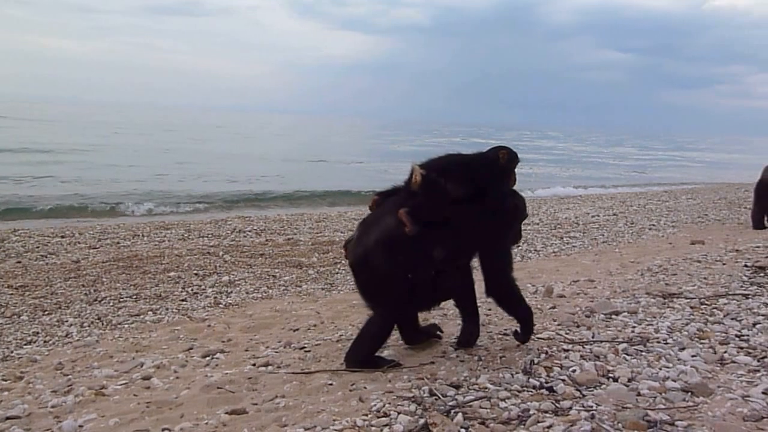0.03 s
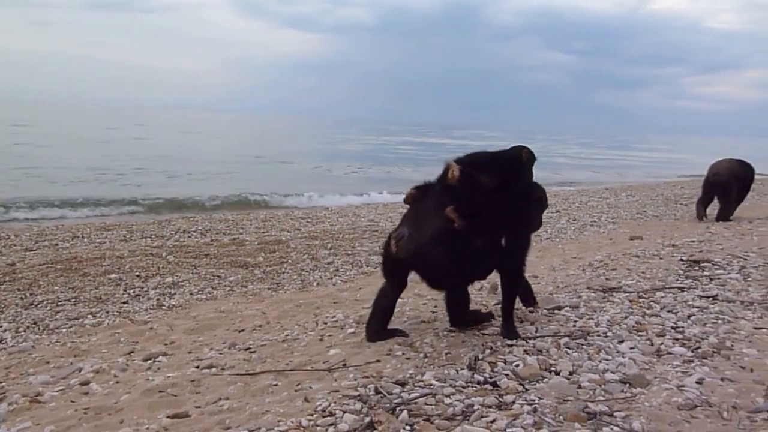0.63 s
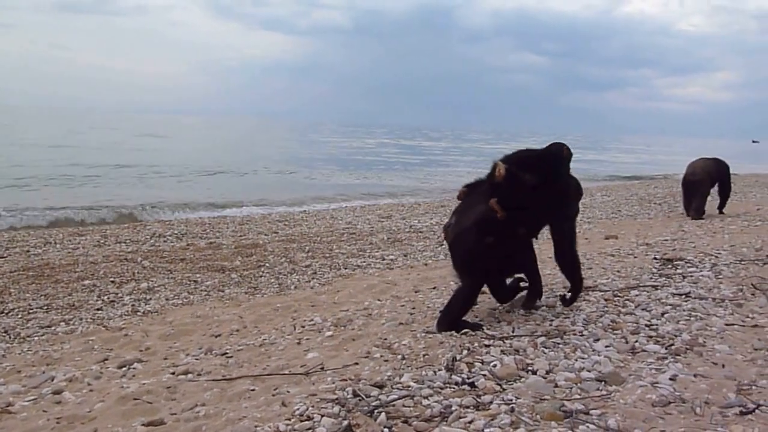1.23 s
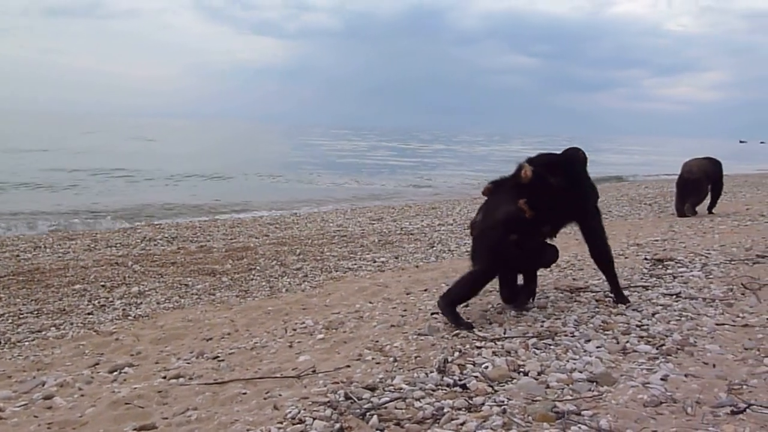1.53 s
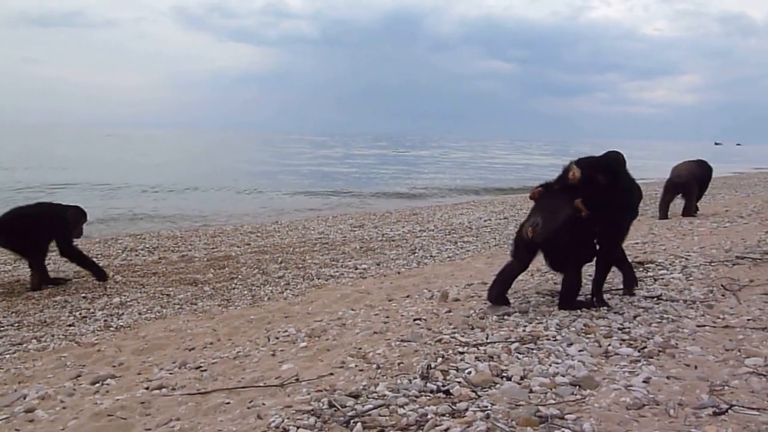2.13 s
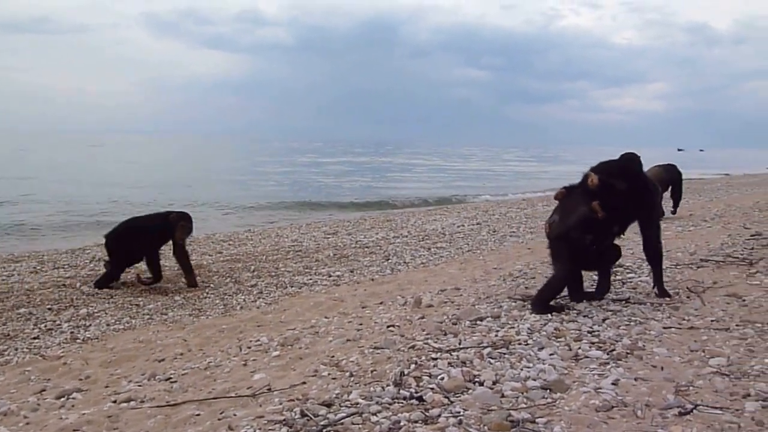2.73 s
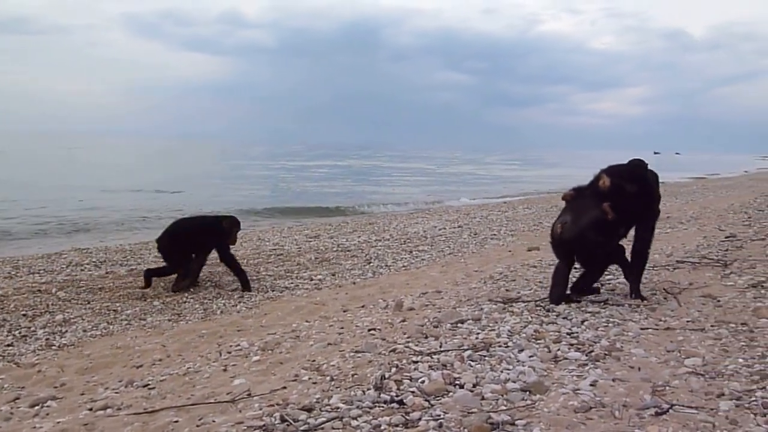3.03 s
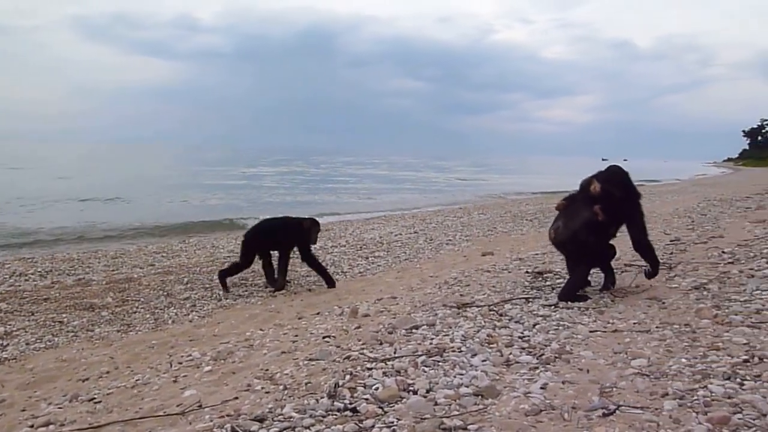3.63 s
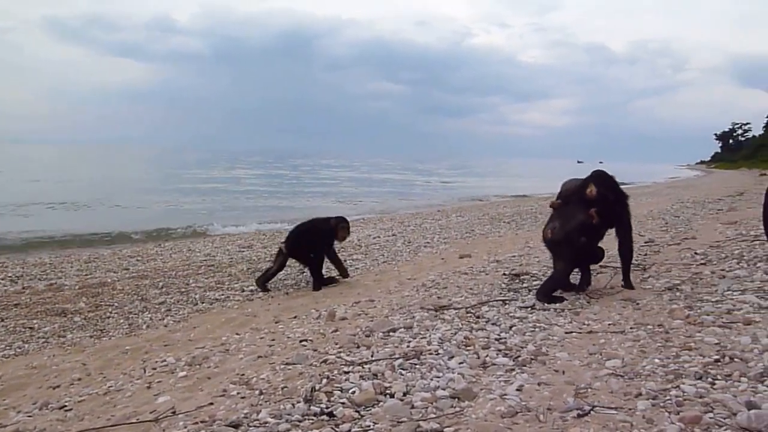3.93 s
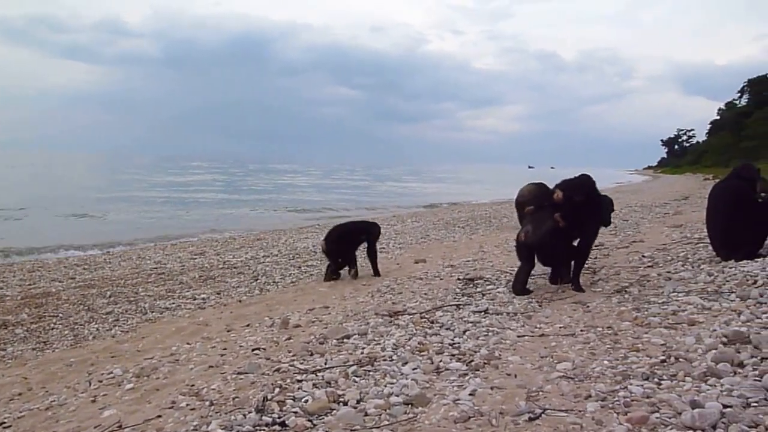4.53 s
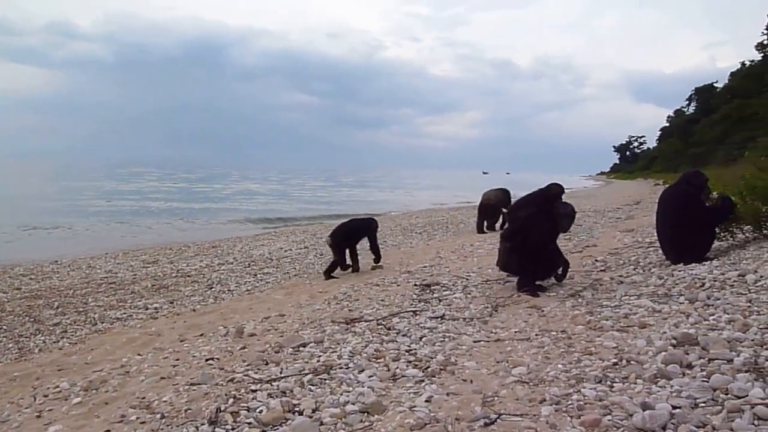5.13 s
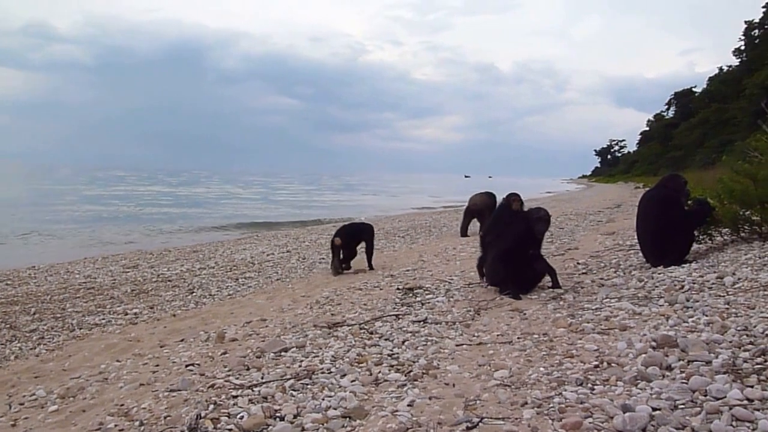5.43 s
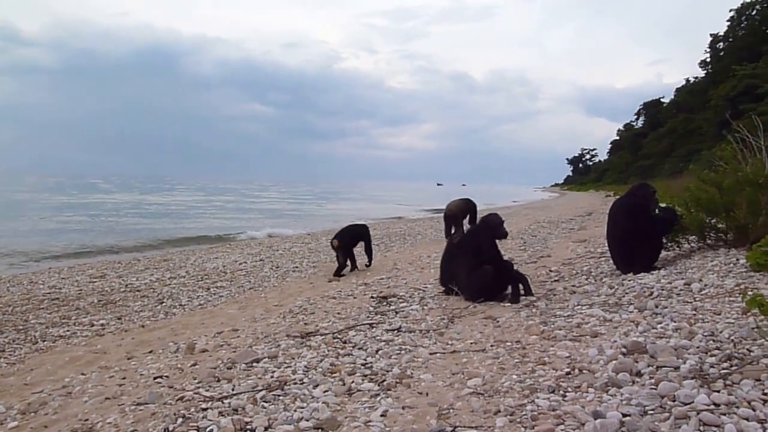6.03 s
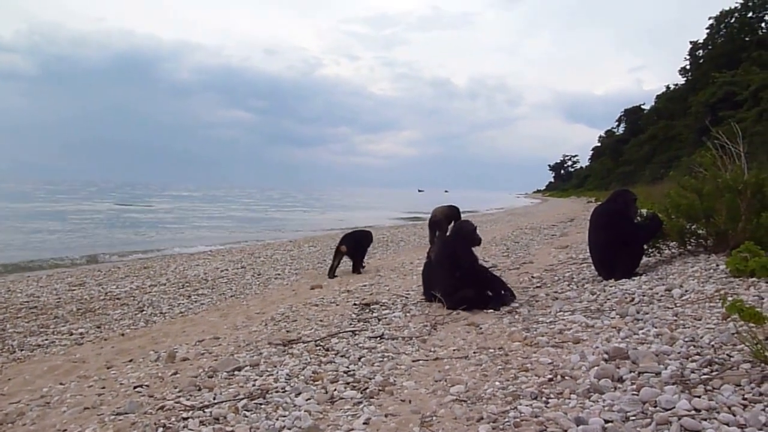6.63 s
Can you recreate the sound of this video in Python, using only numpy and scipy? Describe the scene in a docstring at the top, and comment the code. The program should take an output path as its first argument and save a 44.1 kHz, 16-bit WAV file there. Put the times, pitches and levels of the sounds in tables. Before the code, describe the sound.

Gentle lake waves splash and drain through shingle, with faint crunching animal footsteps and a soft breeze on the microphone.

```python
"""Small lake waves wash up a pebble beach, over a faint hum and a light breeze on a camera's microphone.
From the start foam fizzes, bubbles pop, water slaps over air pockets, and passing chimpanzees
crunch faintly on the shingle. Near 1 s a wave breaks close on the left, throws spray and drains away.
Softer washes follow, with more steps around 3 s. Just after 4 s a second wave breaks on the left;
then loose stones knock, small bubbles plop and a few last steps sound under two gentle washes."""
import sys
import numpy as np
from scipy import signal
from scipy.io import wavfile
from scipy.ndimage import uniform_filter1d

SR = 44100
rng = np.random.default_rng(int(sys.argv[2]) if len(sys.argv) > 2 else 0)


def to_wav(sig):
    """Store sig (one row per channel, or 1-D mono) as 16-bit WAV at the path in sys.argv[1].

    Samples outside -1..1 are clipped; the rate is SR.
    """
    pcm = np.clip(np.atleast_2d(sig), -1, 1) * 32767
    pcm = np.round(pcm).astype(np.int16)
    wavfile.write(sys.argv[1], SR, pcm.T)  # frames by channels


N = 303408
TIME = np.arange(N) / SR
FRAME, HOP = 1024, 256
FRAME_S = np.arange(N // HOP + 5) * HOP / SR
BIN_HZ = np.fft.rfftfreq(FRAME, 1 / SR)


def gain_of(db):
    """Decibels to amplitude."""
    return 10 ** (np.asarray(db) / 20)


def pan(left_db):
    """Stereo gains that put the left channel left_db above the right."""
    return gain_of(left_db * np.array([[1], [-1]]) / 2)


def unit_rms(x):
    """Normalises to an rms of one."""
    return x / np.sqrt(np.mean(x ** 2) + 1e-20)


def curve(points, hz=BIN_HZ):
    """Draws a curve through breakpoints on a log-frequency axis."""
    point_hz, value = np.transpose(points)
    return np.interp(np.log(hz + 1), np.log(point_hz + 1), value)


def automation(points, column=1):
    """Reads one automation lane at every frame."""
    lanes = np.transpose(points)
    return np.interp(FRAME_S, lanes[0], lanes[column])[:, None]


def patches(frames, bins):
    """Smooth random modulation over time and frequency."""
    noise = rng.standard_normal((len(FRAME_S), len(BIN_HZ)))
    return unit_rms(uniform_filter1d(uniform_filter1d(noise, frames, axis=0), bins, axis=1))


def stereo_noise(colour_db, unshared_db, lead_rad=0, left_db=0):
    """Noise through a moving EQ, as two closely spaced microphone ports hear it."""
    a, b, c, d = rng.standard_normal((4, len(FRAME_S), len(BIN_HZ)))
    left, independent = a + 1j * b, c + 1j * d
    unshared = np.minimum(gain_of(unshared_db), 1)
    right = (np.sqrt(1 - unshared ** 2) * left + unshared * independent) * np.exp(-1j * lead_rad)
    spectra = np.array([left * gain_of(left_db / 2), right * gain_of(-left_db / 2)]) * gain_of(colour_db)
    _, noise = signal.istft(spectra.swapaxes(1, 2), nperseg=FRAME, noverlap=FRAME - HOP)
    return unit_rms(noise[:, :N])


def grains(per_s, band_hz, cycles, width, spread_db=0, chirp=0, pitches=32):
    """A cloud of tiny pings that decay by 1/e in `cycles` periods, each pitch with its own pan."""
    out = np.zeros((2, N))
    for hz in np.geomspace(*band_hz, pitches):
        age = np.arange(int(10 * cycles * SR / hz)) * hz / SR / cycles  # in decay times
        ping = np.sin(2 * np.pi * cycles * age * (1 + chirp * age)) * np.exp(-age) * np.sqrt(hz)
        ping *= 1 - np.exp(-2 * cycles * age)  # attack within the first cycle
        triggers = rng.random(N) < per_s / pitches / SR
        accents = gain_of(spread_db * np.minimum(rng.exponential(1, N), 4))
        side = width * (2 * rng.random() - 1)
        out += np.array([[1 + side], [1 - side]]) * signal.oaconvolve(triggers * accents, ping)[:N]
    return unit_rms(out)


def resonate(x, hz, width_hz):
    """A sweepable band-pass centred on hz, with a double pole for steep skirts."""
    carrier = np.exp(2j * np.pi * np.cumsum(hz * np.ones(len(x))) / SR)
    pole = np.exp(-np.pi * width_hz / SR)
    baseband = signal.lfilter([(1 - pole) ** 2], [1, -2 * pole, pole * pole], x / carrier)
    return unit_rms((carrier * baseband).real)


def hum(db=-67, hz=138, waver_hz=1.0):
    """A faint low tone with a wavering pitch."""
    drift = unit_rms(uniform_filter1d(rng.standard_normal(N), size=3000))
    return gain_of(db) * unit_rms(np.sin(2 * np.pi * np.cumsum(hz + waver_hz * drift) / SR))


# EQ of the breeze: f/Hz, level/dB
BREEZE_EQ = [(25, -53), (55, -51), (80, -56), (105, -28), (135, -31.5), (175, -6), (220, -7), (280, 3),
             (345, -1.5), (430, -3), (700, -23.5), (2000, -59.5)]
def breeze(db=-46.5):
    """Air buffets the microphone: a lumpy, nearly mono rumble with hardly any sub-bass."""
    colour_db = curve(BREEZE_EQ) + 2.1 * patches(frames=14, bins=6)
    return stereo_noise(colour_db, unshared_db=-18.5) * gain_of(db)


# footfall cues: t/s, level/dB, decay/s, fine gravel share/0-1
FOOTFALLS = [(0.035, -34.5, 0.053, 0.05), (0.36, -42, 0.066, 0.8), (0.49, -39, .04, .85),
             (0.595, -26, 0.02, 0.06), (0.83, -45, 0.035, .6), (0.893, -36, .012, 0.2),
             (2.083, -32.5, 0.054, 0.05), (2.96, -32, 0.02, .4), (3.028, -38, 0.034, .75),
             (3.118, -33.5, 0.045, 0.1), (3.25, -36, .03, 0), (3.342, -31, 0.015, .92),
             (3.722, -42, 0.032, 0.5), (4.04, -42, .025, .5), (4.14, -48, 0.033, 0.3),
             (5.845, -42, 0.051, 0.4), (5.891, -44, .012, .6), (6.033, -29, .012, 0), (6.325, -39, .02, .6),
             (6.737, -41, 0.019, 0.7)]
def footsteps(db=1.0, attack_s=0.022):
    """Chimpanzee feet press the shingle: short crunches of stones and gravel, slightly right."""
    start, level_db, decay_s, fine = np.transpose(FOOTFALLS)[:, :, None]
    age = np.maximum(TIME - start, 0)
    press = gain_of(level_db) * (1 - np.exp(-age / attack_s)) * np.exp(-age / decay_s)
    stones = grains(per_s=2200, band_hz=(2200, 5000), cycles=6, width=0.3, spread_db=3)
    gravel = grains(per_s=1500, band_hz=(4700, 7200), cycles=11, width=0.3, spread_db=3)
    crunch = stones * (press * np.sqrt(1 - fine)).sum(0) + gravel * (press * np.sqrt(fine)).sum(0)
    return crunch * gain_of(db) * pan(left_db=-1)


# stone hits: t/s, level/dB, f/Hz
STONE_HITS = [(4.273, -27, 2250), (5.273, -33, 2250), (5.389, -34, 2250), (5.656, -30, 2150),
              (6.439, -32, 2400)]
def knocks(decay_s=0.0055, width_hz=1400):
    """A loose stone tips onto its neighbour with a short, dry tick."""
    out = np.zeros(N)
    for start, level_db, hz in STONE_HITS:
        age = np.maximum(TIME - start, 0) / decay_s
        stone = resonate(resonate(rng.standard_normal(N), hz, width_hz), hz, width_hz)
        out += gain_of(level_db) * (1 - np.exp(-2 * age)) * np.exp(-age) * stone
    return out


# wave cues: t/s, level/dB, attack/s, hold/s, foam send/dB, rumble send/dB, share breaking left/0-1
WAVE_CUES = [(-0.1, -36, 0.064, 0.58, -6.5, -9.5, 0.1), (0.469, -35, 0.24, 0.25, -7.5, -14, 0.27),
             (0.845, -33, 0.38, 0.73, -7.5, -7.5, 0.88), (2.083, -43, 0.22, 0.31, -4.5, -3, 0.76),
             (2.421, -40.5, 0.63, 0.36, -3, -9, 0.2), (3.452, -40.5, 0.27, 0.42, -9.5, -18, 0),
             (4.075, -42.5, 0.087, 0.16, -4, -10, 0.5), (4.25, -35.5, 0.21, 0.41, -10.5, -7, 0.8),
             (5.547, -39.5, 0.51, 0.25, -8.5, -13, .35), (6.246, -40.5, .25, 0.46, -8, -5.5, 0.3)]
def wave_powers(t, drain_s=0.53):
    """Each wave swells, holds while it spills, then drains away: one power envelope per wave."""
    start, level_db, attack_s, hold_s = np.transpose(WAVE_CUES)[:4, :, None]
    age = t - start
    swell = np.clip(age / attack_s, 0, 1)
    drain = np.exp(-np.maximum(age - attack_s - hold_s, 0) / drain_s)
    return (gain_of(level_db) * swell * drain) ** 2


def water_controls(t, lap_db=-43.5, lap_foam_db=-6, lap_left=0.19, foam_fade_db_per_s=2.5):
    """Waves over a bed of steady lapping: level/dB, foam send/dB, share breaking left/0-1."""
    start, _, _, _, foam_db, _, left = np.transpose(WAVE_CUES)[:, :, None]
    powers, lapping = wave_powers(t), gain_of(lap_db) ** 2
    total = powers.sum(0) + lapping
    freshness = gain_of(foam_db - foam_fade_db_per_s * (t - start)) ** 2  # dulls as the foam bursts
    foam = (powers * freshness).sum(0) + lapping * gain_of(lap_foam_db) ** 2
    breaking = (powers * left).sum(0) + lapping * lap_left
    return 10 * np.log10(total), 10 * np.log10(foam / total), breaking / total


def rolling_pebbles(db=-14.0):
    """Pebbles grind softly together under the foam: a wide, bright ticking."""
    level_db, foam_db, _ = water_controls(TIME)
    ticks = grains(per_s=1100, band_hz=(2610, 6600), cycles=9, width=0.95, spread_db=5.5)
    return ticks * gain_of(level_db + foam_db + db)


def bubbles(db=-11, lean_db=3):
    """Small bubbles ring with a rising pitch, riding the water's level and leaning toward the breaker."""
    level_db, _, breaking = water_controls(TIME)
    pops = grains(per_s=380, band_hz=(584.6, 2827), cycles=5.8, width=0.15, spread_db=2.5, chirp=0.0036)
    return pops * gain_of(level_db + db) * pan(lean_db * breaking)


# EQ of churned water: f/Hz, level/dB
CHURN_EQ = [(60, -58), (105, -36), (140, -39), (175, -16), (230, -10.5), (283, 7.5), (345, 2.5), (430, -7),
            (560, -11.5), (760, -3), (1000, -24.5), (2000, -62)]
def churn(db=-0.6):
    """Churned water puts a low body under each wave."""
    colour_db = curve(CHURN_EQ) + 0.77 * patches(frames=10, bins=4)
    rumble = stereo_noise(colour_db, unshared_db=-31.5, left_db=-1.0)
    send_db = np.array(WAVE_CUES)[:, 5, None]
    powers = wave_powers(TIME) * gain_of(send_db + db) ** 2
    return rumble * np.sqrt(powers.sum(0))


# large bubbles: t/s, level/dB, f/Hz
BIG_BUBBLES = [(0.284, -32, 322), (1.527, -28.5, 323), (1.846, -35, 322), (1.895, -47, 301),
               (3.78, -39, 358), (4.146, -34, 325), (4.506, -29.5, 308), (4.663, -40, 297),
               (5.613, -34, 875), (5.716, -35, 873), (6.117, -37, 296), (6.484, -44, 312)]
def plops(cycles=4.5, damping_hz=330, chirp_per_s=2):
    """Large bubbles ring as deep glugs or small plops, bending upward; the deep ones ring longest."""
    out = np.zeros(N)
    for start, level_db, hz in BIG_BUBBLES:
        ring_s = cycles / (hz + damping_hz)
        age = np.clip(TIME - start, 0, 10 * ring_s)
        swell = age / ring_s * np.exp(1 - age / ring_s)
        out += gain_of(level_db) * swell * np.sin(2 * np.pi * hz * age * (1 + chirp_per_s * age / 2))
    return out


# hollow slaps: t/s, level/dB, half length/s, f/Hz
SLAP_CUES = [(0.062, -39, 0.11, 303), (0.548, -45, 0.07, 292), (0.915, -39, 0.046, 290),
             (1.092, -38, 0.074, 329), (1.42, -37, .05, 815), (1.615, -38.5, 0.069, 820),
             (1.85, -37, .07, 530), (1.9, -39, 0.055, 290), (2.128, -42, 0.074, 330),
             (2.376, -44, 0.073, 800), (2.925, -44, .03, 460), (3.09, -42.5, 0.027, 290),
             (3.15, -46, 0.094, 710), (3.505, -44.5, 0.061, 470), (3.75, -40.5, 0.029, 800),
             (3.794, -38, 0.054, 303), (3.87, -42, 0.02, 860), (4.132, -42, 0.02, 660),
             (4.213, -38.5, .016, 570), (4.26, -50, 0.025, 290), (4.376, -44.5, 0.067, 610),
             (4.57, -43, 0.035, 700), (4.73, -45, 0.033, 480), (4.917, -47, 0.067, 300),
             (5.073, -42.5, 0.031, 500), (5.208, -43, 0.038, 300), (5.88, -43.5, 0.04, 290),
             (6.063, -44, 0.029, 1110), (6.12, -36.5, 0.022, 288), (6.168, -42.5, 0.031, 540),
             (6.238, -43, .012, 710), (6.297, -45, .02, 850), (6.437, -45, .015, 950),
             (6.507, -43, 0.073, 300), (6.58, -42, .025, 930), (6.794, -48, 0.042, 285),
             (6.853, -43, .025, 1150)]
def slaps(db=-0.5, gurgle_db=2.5, gurgle_per_s=90, glide_oct=0.1, bandwidth_ratio=0.47, low_cut_hz=210):
    """Water folds over a pocket of air, which gurgles and rises in pitch as it closes."""
    out, knots = np.zeros(N), np.arange(N // 20)
    wobble = np.interp(TIME * gurgle_per_s, knots, rng.standard_normal(len(knots)))
    gurgle = unit_rms(gain_of(gurgle_db * wobble))  # the air breaks up unevenly
    for centre, level_db, half_s, hz in SLAP_CUES:
        near = abs(TIME - centre) < 2.5 * half_s
        offset = (TIME[near] - centre) / half_s  # in half lengths
        churning = (gurgle * rng.standard_normal(N))[near]
        pocket = resonate(churning, hz * 2 ** (glide_oct * offset), bandwidth_ratio * hz)
        out[near] += gain_of(level_db + db) * np.exp(-offset ** 2 / 2) * pocket
    low_cut = signal.butter(4, low_cut_hz, "high", fs=SR, output="sos")
    return signal.sosfilt(low_cut, out) * pan(left_db=0.5)


# crest splashes: t/s, level/dB, half length/s, fine spray share/0-1
SPLASH_CUES = [(0.68, -37, 0.033, .15), (1.1, -40, .04, .9), (1.305, -33, 0.03, 0.14), (1.5, -47, .04, .5),
               (1.662, -32.5, 0.055, .55), (2.0, -40, 0.033, .05), (3.614, -40.5, 0.032, 0.02),
               (4.187, -33, 0.013, .1), (4.29, -44, .03, .3), (4.43, -42, .02, 0.6),
               (4.474, -41, .012, 0.1), (4.505, -37.5, 0.0082, .5), (4.59, -39, 0.04, .25),
               (4.73, -38, 0.027, .05), (4.883, -47, 0.018, .7), (5.015, -40, 0.04, .2)]
def spray(db=-3.0):
    """A collapsing crest throws a short shower of large drops and fine mist on the left."""
    centre, level_db, half_s, fine = np.transpose(SPLASH_CUES)[:, :, None]
    shower = gain_of(level_db) * np.exp(-((TIME - centre) / half_s) ** 2)
    drops = grains(per_s=2500, band_hz=(1094, 2710), cycles=6.1, width=0.4, chirp=0.004)
    mist = np.array([grains(per_s=6700, band_hz=(2600, 6800), cycles=6.3, width=0, spread_db=2.0)[0]
                     for _ in range(2)])  # a separate cloud per channel
    splash = drops * (shower * np.sqrt(1 - fine)).sum(0) + mist * (shower * np.sqrt(fine)).sum(0)
    return splash * gain_of(db) * pan(left_db=5)


# comb-like ripple from a nearby reflection: f/Hz, level/dB
RIPPLE_EQ = [(600, -0.5), (800, 1.2), (1090, -2.5), (1430, 5), (1800, -4.5), (2250, 3), (2770, -1.5),
             (3220, 0), (3720, -2), (4150, 0.1), (4700, 0), (5500, 0.5)]
# the ripple sweeps as the water moves and the camera turns: t/s, frequency/ratio, depth/ratio
RIPPLE_SWEEP = [(0, 0.99, 1.2), (0.9, 1.01, 1.1), (1.5, 1.05, 1.2), (1.9, 1.17, 0.14), (2.3, 0.88, .45),
                (3.3, 0.93, 0.54), (4.3, .97, 1), (5.0, 1.03, 0.93), (5.6, 0.89, 0.36), (6.3, 0.85, 0.59)]
def water_colour(eq, patchy_db, flicker_db):
    """The water's moving EQ: foam lifts the treble, a reflection ripples it, splashes come in patches."""
    _, foam_db, _ = water_controls(FRAME_S)
    treble_shelf = curve([(1300, 0.3), (3000, 0.27), (5000, 0.93)])
    foam = (foam_db - foam_db.mean())[:, None] * treble_shelf
    shift, depth = automation(RIPPLE_SWEEP, 1), automation(RIPPLE_SWEEP, 2)
    ripple = depth * curve(RIPPLE_EQ, BIN_HZ / shift)
    splashes = patchy_db * patches(frames=12, bins=14) + flicker_db * patches(frames=7, bins=150)
    return curve(eq) + foam + splashes + np.array([0.55 * ripple, 1.05 * ripple])  # deeper on the right


# stereo width automation: t/s, width/dB
SHORE_WIDTH = [(0, -1), (0.75, -5.5), (1.4, -2.5), (2.2, 3.5), (3.0, 0), (3.7, -1.5), (4.5, -2.5), (5.0, 2),
               (5.6, 4), (6.3, 0.5), (6.88, -2)]
def shore_spread(unshared_points):
    """A wave lands at one spot and spreads along the shore, so the two channels have less in common."""
    unshared = np.minimum(gain_of(curve(unshared_points)) ** 2, 0.99)
    widened = unshared * gain_of(automation(SHORE_WIDTH)) ** 2
    return 10 * np.log10(widened / (1 - unshared + widened))


# EQ of the swash: f/Hz, level/dB
SWASH_EQ = [(100, -48), (175, -10.5), (330, -1), (900, 1.45), (1300, -0.5), (1750, -3), (2300, -4),
            (2800, -3.3), (3200, -2.5), (4200, -7.5), (6000, -11.5), (7200, -16.5), (7650, -24),
            (8000, -59)]
# its stereo image: f/Hz, then unshared part/dB, left phase lead/rad and left over right/dB in turn
SWASH_UNSHARED = [(200, -26), (500, -6), (900, -8.5), (1350, -7), (1700, 0), (2100, -3.5), (2700, -1.5),
                  (4500, -1.5), (7500, -2)]
SWASH_PHASE = [(1400, 0), (2000, -.15), (2500, .3), (2900, 0), (3900, .35), (5700, .25), (7500, 0)]
SWASH_PAN = [(200, 0), (900, .8), (1700, 1), (3000, -0.67), (5000, .3), (7500, -.3)]
def swash(db=1.78):
    """Thin sheets of water hiss up the beach and drain through the pebbles ahead."""
    level_db, _, breaking = water_controls(TIME)
    colour_db = water_colour(SWASH_EQ, patchy_db=0.72, flicker_db=0.5)
    hiss = stereo_noise(colour_db, shore_spread(SWASH_UNSHARED), curve(SWASH_PHASE), curve(SWASH_PAN))
    return hiss * gain_of(level_db + db) * np.sqrt(1 - breaking)


# EQ of the breaker: f/Hz, level/dB
BREAKER_EQ = [(100, -39.5), (175, -12), (330, -2), (830, 2.5), (1100, -1.5), (1500, -2.5), (2350, -2.5),
              (2800, -8), (3500, -7), (4500, -7.5), (6100, -11.5), (7200, -16.5), (7650, -25.5),
              (8000, -59)]
# its stereo image: f/Hz, then unshared part/dB, left phase lead/rad and left over right/dB in turn
BREAKER_UNSHARED = [(200, -31), (500, -12), (800, -15), (1200, -3.5), (1550, -9.5), (1800, -6), (2150, -8),
                    (2500, 0), (3000, -1), (4400, -0.4), (6500, -1.66)]
BREAKER_PHASE = [(900, 0), (1300, -.22), (2000, -.4), (2300, .15), (2650, 1.1), (3200, 5.3), (3850, 7),
                 (5200, 12.9), (7000, 13.1)]
BREAKER_PAN = [(200, .2), (750, 1.9), (1200, 6.5), (1500, 9.8), (1800, 7.9), (2300, 6.6), (3000, 11.7),
               (5000, 4.9), (6200, 7.2), (7200, .5)]
# pan automation as it runs along the shore: t/s, pan depth/ratio
BREAKER_TRAVEL = [(0.9, 1.12), (1.5, 1.24), (2.2, 0.7), (3.0, 0.54), (4.1, 1.4), (4.6, 1.25), (5.3, 0.87)]
def breaker(db=3.0):
    """A low crest spills over close on the left; the camera body shades the right port."""
    level_db, _, breaking = water_controls(TIME)
    colour_db = water_colour(BREAKER_EQ, patchy_db=0.22, flicker_db=0.07)
    left_db = automation(BREAKER_TRAVEL) * curve(BREAKER_PAN)
    rush = stereo_noise(colour_db, shore_spread(BREAKER_UNSHARED), curve(BREAKER_PHASE), left_db)
    return rush * gain_of(level_db + db) * np.sqrt(breaking)


def scene():
    """The mix: water up front, stones and steps behind it, breeze and hum as the bed."""
    water = swash() + breaker() + spray() + churn() + slaps() + bubbles() + plops()
    return water + rolling_pebbles() + knocks() + footsteps() + breeze() + hum()


def record(dry, wind_filter_hz=70, high_cut_hz=8050):
    """The camera's wind filter and its steep high cut."""
    thinned = signal.sosfilt(signal.butter(2, wind_filter_hz, "high", fs=SR, output="sos"), dry)
    high_cut = signal.firwin(511, high_cut_hz, window=("kaiser", 9), fs=SR)
    return signal.oaconvolve(thinned, high_cut[None], "same")


dry = scene()
out = record(dry)
to_wav(out)
```